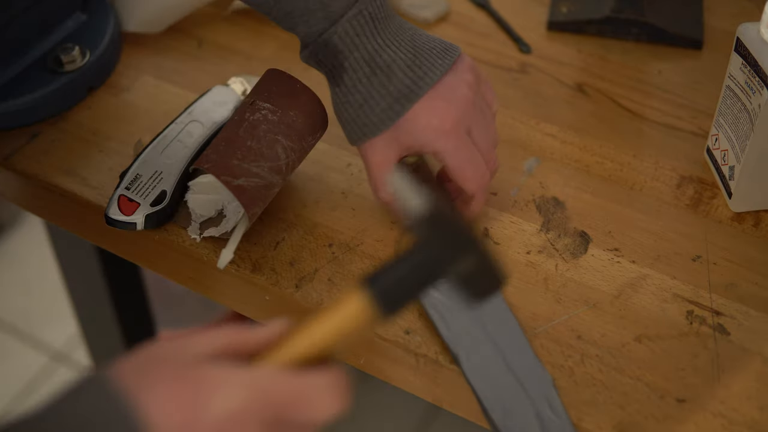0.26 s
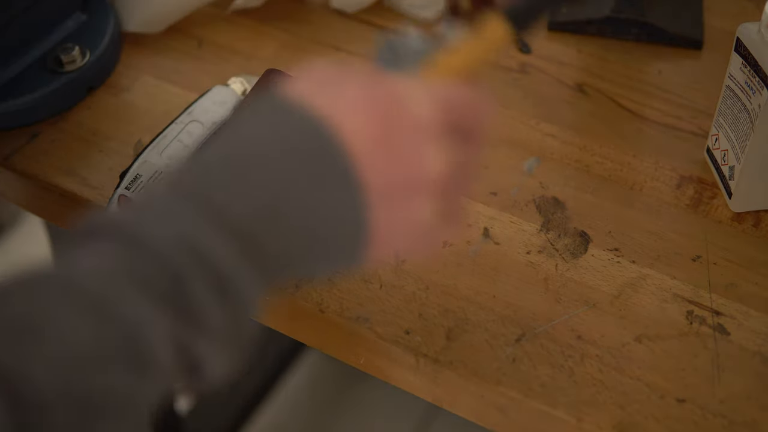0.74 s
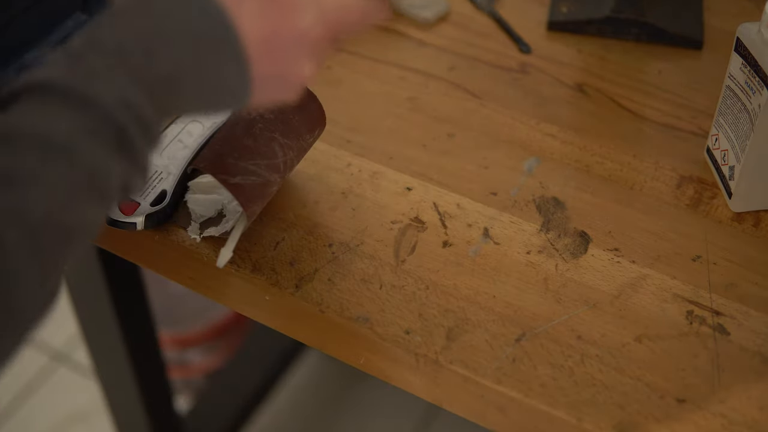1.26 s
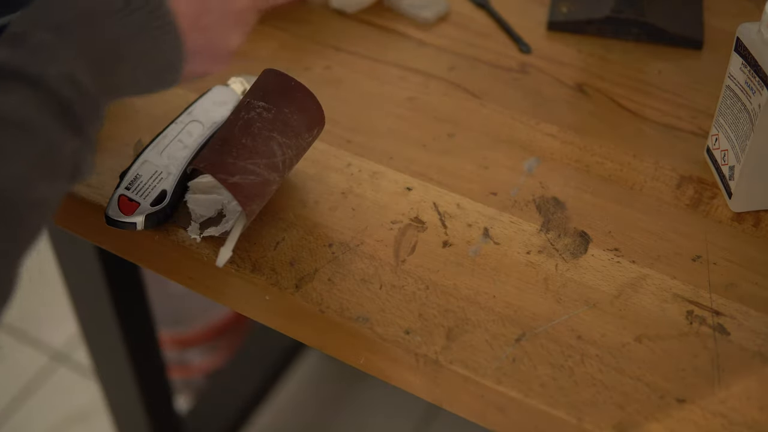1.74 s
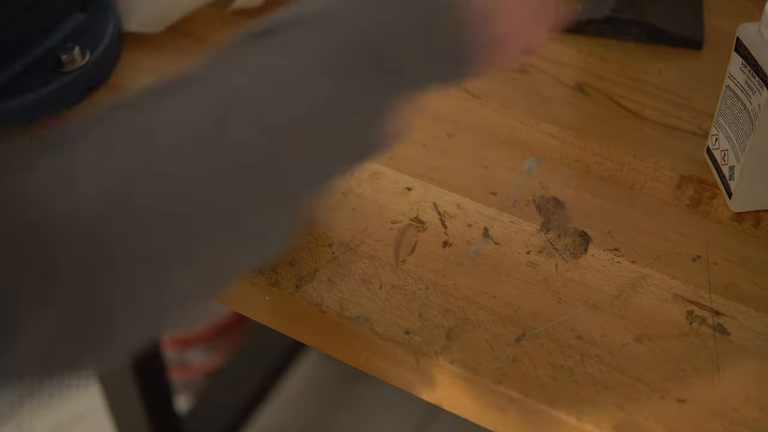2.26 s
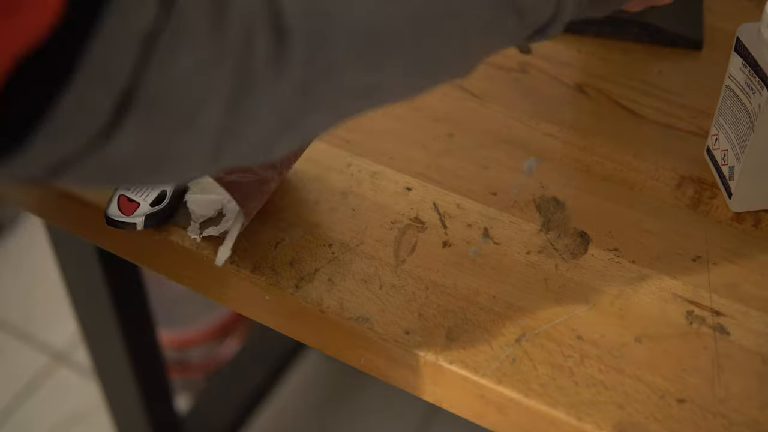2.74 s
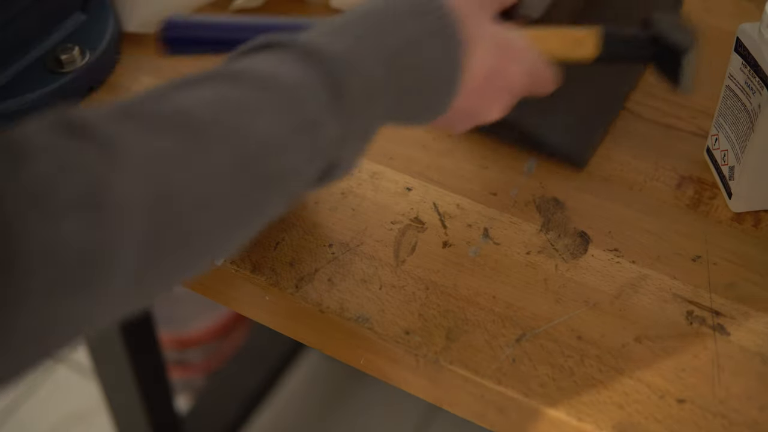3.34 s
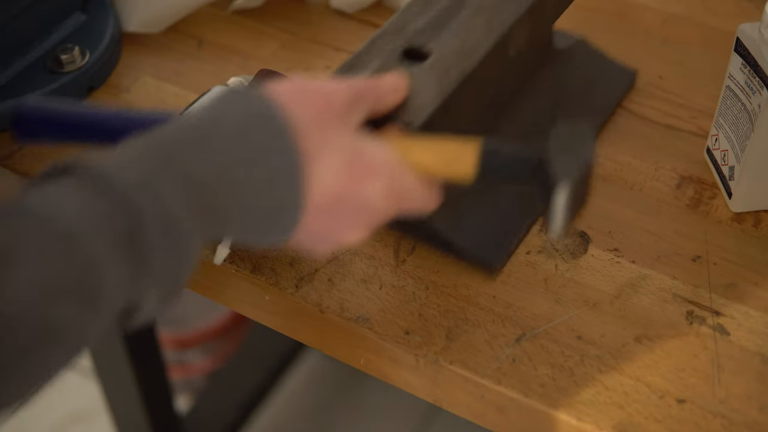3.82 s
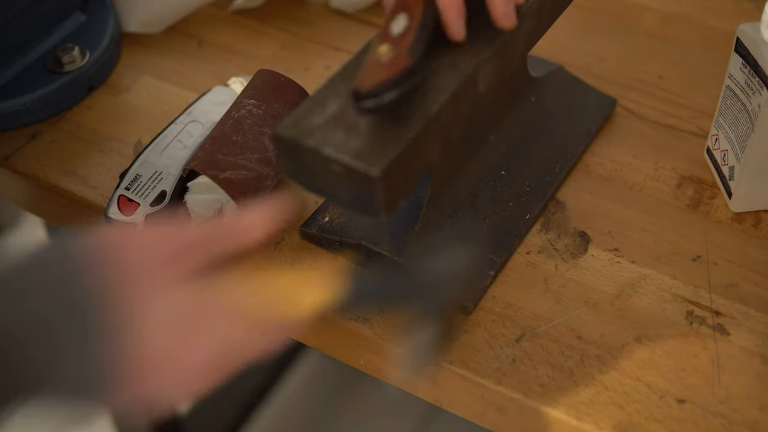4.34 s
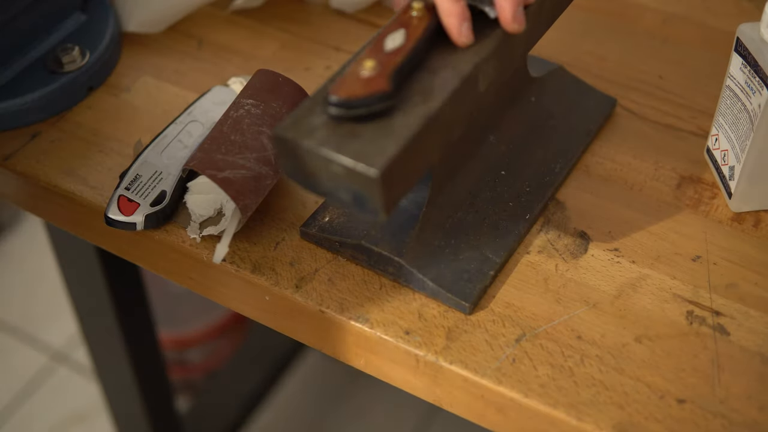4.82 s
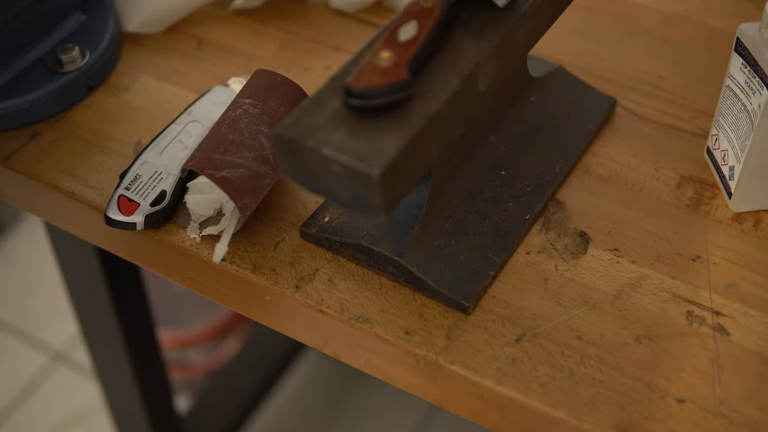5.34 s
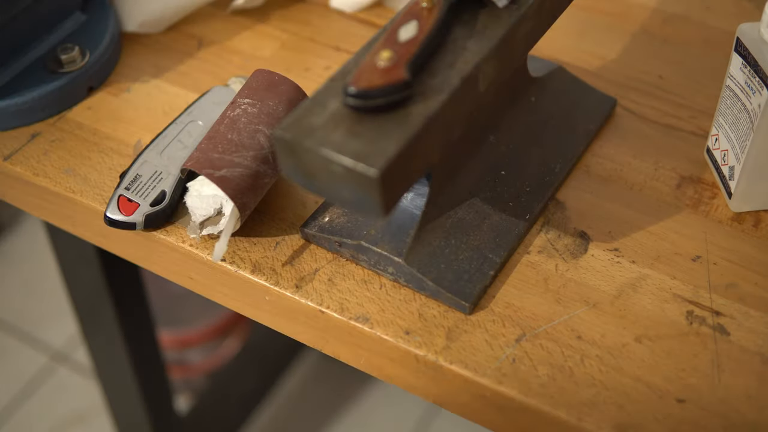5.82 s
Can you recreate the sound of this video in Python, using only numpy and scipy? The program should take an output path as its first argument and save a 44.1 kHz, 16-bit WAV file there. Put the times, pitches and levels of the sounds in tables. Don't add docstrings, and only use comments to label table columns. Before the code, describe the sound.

Close up at a wooden workbench in a small tiled room with quiet, low air noise. From 0 to 0.3 s, faint dull bumps as tools are handled; between 0.6 and 1.5 s, small dry ticks and clacks, with soft hand and sleeve brushing that continues to about 2.5 s. Around 2.8 s a sharp clack, and a small heavy anvil breaks loose, dragging until about 4.3 s: a coarse juddering scrape, hollow droning of the bench, gritty hiss and thin wavering steel squeals, strongest near 3.3 s with a hard clack at 3.25 s. It eases and stops. At 4.52 s a knife clatters brightly onto the steel, rocking in quick taps until 4.6 s while the bench answers with woody thumps and short echo. Soft bumps follow near 5.1 and 5.5 s, a dead knock, then brushing that swells to a louder rub and bump at 6 s.

```python
import sys
import numpy as np
from scipy import signal
from scipy.fft import rfft, irfft, next_fast_len
from scipy.io import wavfile
from scipy.ndimage import uniform_filter1d, map_coordinates

SR = 44100
rng = np.random.default_rng(int(sys.argv[2]) if len(sys.argv) > 2 else 0)


def unload_audio(sound):
    columns = np.transpose(np.atleast_2d(sound))
    steps = np.round(np.clip(columns, -1, 1) * 32767)
    wavfile.write(sys.argv[1], SR, steps.astype(np.int16))


def magnitude_from_level(level_db):
    exponent = np.asarray(level_db, float) / 20
    return 10 ** exponent


N = 267687
TOP_HZ = 15800

# pitch_hz, level_db (per Hz)
AIR = [(15, -37), (25, -21), (76, 5.5), (206, -5), (309, -10), (560, -16), (641, -1), (1400, -18),
       (2480, -9.5), (5430, -14), (12200, -14.5), (14800, -22), (16000, -14)]
# pitch_hz, likeness (0 to 1)
ALIKE = [(60, .997), (180, .994), (350, .975), (700, .88), (1400, .76), (2800, .5), (5600, .33),
         (11000, .22)]
# pitch_hz, time to fall 60 dB t60_s
ROOM = [(100, 0.39), (500, 0.49), (2000, 0.62), (6000, 0.45), (14000, 0.36)]
# pitch_hz, width_hz, level_db
BENCH = [(141, 13.5, -8.5), (207, 21, -1), (220.9, 5.1, 2.5), (259, 26.3, -1.5), (291, 25, -6),
         (330, 30, -9.5), (420, 44, -7.5), (547, 31, 0.5), (700, 59, -10), (827, 30, -7)]
# pitch_hz, width_hz, level_db
LEGS = [(72.5, 4, 10.5), (71, 9.8, -7.5)]

# start_s, peak_db, pitch_hz, contact_t60_s
THUDS = [(.001, -46.5, 333, 0.15), (.002, -52, 610, 0.14), (.003, -60.5, 900, .2), (.17, -65, 1400, .12),
         (.04, -53, 330, .2), (.075, -52, 332, 0.22), (.002, -66, 2450, .3), (.168, -54, 650, 0.04),
         (.169, -48, 420, 0.041), (.176, -48.5, 252, 0.1), (.215, -51, 333, 0.11), (.235, -48, 207, 0.14),
         (.298, -58.5, 2720, .06), (.298, -60, 4480, .01), (.974, -56, 700, .02), (1.133, -53.5, 715, .008),
         (4.524, -32, 360, 0.044), (4.57, -31, 433, .08), (4.578, -31, 648, .05), (4.59, -33, 149, 0.16),
         (4.625, -32, 376, 0.11), (5.091, -43, 830, 0.064), (5.094, -35.5, 530, 0.053),
         (5.104, -37, 290, 0.11), (5.165, -45.5, 540, 0.048), (5.17, -45, 281, 0.18),
         (5.451, -47, 784, .04), (5.458, -36.5, 232.5, 0.053), (5.54, -44, 320, 0.03),
         (5.997, -31.5, 740, 0.11)]
# start_s, peak_db, pitch_hz, width_hz
KNOCK = (5.526, -30, 330, 330)

# peak_s (loudest moment), rise_s, fall_s, wood_db, sleeve_over_wood_db
STROKES = [(.31, 0.012, 0.43, -69.5, 1.5), (.64, 0.12, 0.46, -63, -1), (1.0, 0.13, 0.54, -62, -3),
           (1.22, 0.069, 0.38, -59, -4), (1.4, 0.056, 0.14, -59, 1.5), (1.73, 0.16, 0.29, -65, 0),
           (2.06, 0.25, 0.34, -64.5, -0.5), (2.421, 0.13, .3, -57.5, 2.5), (2.76, 0.33, 0.16, -58.5, 5),
           (4.25, 0.075, 0.039, -69, 13.5), (4.399, 0.17, 1, -56, -4), (4.88, 0.16, 0.3, -51.5, -2.5),
           (5.3, 0.13, 0.69, -55, -2.5), (5.465, 0.013, 0.66, -50, -9), (5.69, .1, 0.14, -44.5, -0.5),
           (5.86, 0.037, 0.048, -48, -1.5), (5.95, 0.016, 0.14, -42.5, 5.5), (6.02, 0.055, 0.18, -32.5, -5)]
# peak_s (loudest moment), rise_s, fall_s, level_db
SHOVES = [(.3, .01, 0.19, -66), (.8, 0.088, 0.33, -73), (1.2, 0.48, 0.86, -71.5), (2.0, 1, .3, -70),
          (2.4, 0.13, 0.18, -58.5), (2.76, 0.63, .03, -59.5), (4.2, 0.1, 0.46, -48.5),
          (4.8, 0.17, 0.47, -48.5), (5.2, 0.11, 0.37, -57), (5.465, 0.012, 0.16, -41),
          (5.7, 0.23, 1, -48.5), (5.97, 0.068, .3, -45.5)]
# pitch_hz, level_db (per Hz)
WOOD = [(590, -15), (1000, -8.5), (1270, -3.5), (1420, -4.5), (2330, -3), (2750, -3), (4680, -8.5),
        (6500, -18), (8450, -19), (14300, -120)]
# pitch_hz, level_db (per Hz)
CLOTH = [(2350, -35), (4000, -8), (5940, -4), (12300, -3.5), (15200, -7.5), (15700, -7)]
# pitch_hz, level_db (per Hz)
SHUFFLE = [(24, -40), (45, -3), (70, -4), (123, -10), (182, -1.5), (214, -4), (307, -2.5), (628, -9),
           (1300, -17.5), (1690, -21), (2860, -120)]
# pitch_hz, level_db (per Hz)
NUDGE = [(24, -41), (40, -25.5), (65, -5), (97, -8.5), (243, -4.5), (423, -12.5), (747, -12), (852, -6),
         (1300, -25), (1690, -40), (2860, -120)]

# start_s, clack_db, snap_over_clack_db, clack_hz, contact_t60_s
TICKS = [(.6753, -45.5, -19, 1630, 0.037), (.675, -43, -28, 3870, 0.041), (.948, -41.5, -27, 2800, .002),
         (.9525, -44, -27, 2800, .003), (0.974, -32, -19, 2360, 0.0027), (1.133, -37, -7, 2400, 0.002),
         (1.1372, -41, -12, 2700, .004), (1.2483, -43, -23, 2800, 0.015), (1.329, -41.5, -24, 2850, 0.0067),
         (1.368, -36, -15, 3200, 0.02), (1.497, -49.5, -13, 1700, .006), (2.7748, -38.5, -7, 1460, 0.018),
         (2.834, -25, -3, 1420, 0.028), (3.2497, -19, -11, 1520, 0.0059), (5.451, -41.5, -25, 1290, 0.11)]
# start_s, level_db
SNAPS = [
    (0.6, -39.5),
    (2.9575, -30.5),
    (4.766, -37),
    (5.0554, -28),
    (5.853, -37),
]
# pitch_hz, width_hz, level_db
TOOL = [(1330, 47, 9), (1500, 63, 11.5), (2270, 410, 2), (2746, 49, 9.5), (2850, 63, 9), (3350, 120, 10.5),
        (4000, 110, -1), (4470, 30, 0)]
# delay_s, level_db
BOUNCE = (.0043, -11)

# time_s, level_db
DRAG = [
    (2.76, -54.5),
    (2.88, -28.5),
    (3.02, -30.5),
    (3.31, -24.5),
    (3.55, -31),
    (3.66, -31.5),
    (3.76, -29),
    (3.98, -31.5),
    (4.3, -59.5),
]
# middle_s, half_length_s, extra_drone_db, bench_note_hz
JUDDERS = [
    (2.92, 0.093, 4.5, 267),
    (3.291, 0.023, 3, 232),
    (3.414, 0.1, 9, 224),
    (3.625, 0.12, -2, 250),
    (3.943, 0.068, -3.5, 226.5),
    (4.13, 0.19, 7.5, 260),
]
# peak_s (loudest moment), rise_s, fall_s, level_db
LURCHES = [
    (2.825, .015, 0.066, -33.5),
    (3.245, 0.02, .12, -35),
    (3.438, 0.019, .05, -35),
    (3.722, 0.024, 0.046, -47),
    (4.17, 0.066, 0.1, -48),
]
# pitch_hz, level_db (per Hz)
SCRAPE = [(210, -41), (350, -10), (467, -10), (550, -6), (639, -6.5), (1180, -10.5), (1370, -13),
          (1620, -13.5), (3260, -19.5), (7000, -50), (9100, -51), (15400, -120)]
# pitch_hz, level_db (per Hz)
GRIT = [(2350, -13), (4000, -2.5), (4280, -2), (5770, -7.5), (6290, -9), (11300, -15.5), (15700, -21)]
# pitch_hz, level_db, flare_s, flare_half_length_s
ANVIL = [(1330, -15.6, 3.31, 0.1), (1410, -3, 2.87, 0.1), (1410, -12, 3.3, .08), (1523, -11.1, 3.3, 0.1),
         (1803, -15.8, 3.44, 0.15), (2051, -19.9, 3.15, 0.26), (2331, -20.4, 2.95, 0.15),
         (2649, -22.9, 3.83, 0.53), (2930, -14, 3.07, 0.13), (3295, -22.6, 3.54, 0.29),
         (3555, -23.5, 3.36, 0.17)]
# pitch_hz, level_db, flare_s, flare_half_length_s
SQUEAL = [(4155, -23.0, 4.01, 0.08), (4155, -22.5, 3.74, 0.13), (4263, -22.6, 3.69, 0.12),
          (4941, -26.0, 3.96, 0.08), (4941, -24.9, 3.76, 0.1), (4941, -22.8, 3.3, 0.12),
          (4984, -22.7, 3.11, 0.24), (5577, -26.0, 3.21, 0.1), (5577, -23.5, 3.84, 0.08),
          (5598, -27.5, 3.21, 0.09), (5598, -23.3, 3.85, 0.09), (5749, -20.1, 4.06, 0.08),
          (5835, -26.6, 3.75, 0.2), (6556, -29.2, 3.34, 0.12), (7256, -29.8, 3.32, 0.08),
          (7332, -32.0, 3.51, 0.15), (7332, -28.9, 4.11, 0.18), (7332, -26.2, 3.23, 0.07),
          (8204, -33.9, 3.04, 0.12), (8204, -32.5, 3.81, 0.05), (8204, -26.1, 3.49, 0.16),
          (8505, -33.7, 3.95, 0.11), (8505, -32.9, 3.69, 0.38), (9237, -31.3, 3.07, 0.09),
          (9237, -25.9, 4.14, 0.15), (9388, -34.1, 3.64, 0.09), (9388, -29.9, 3.38, 0.07),
          (10002, -37.1, 3.48, 0.11), (10002, -34.1, 3.72, 0.12), (10002, -32.8, 3.02, 0.15),
          (10885, -34.9, 3.58, 0.08), (11283, -27.6, 4.07, 0.1), (11283, -26.9, 3.3, 0.09),
          (11283, -23.1, 3.69, 0.08), (12037, -34.8, 3.97, 0.13), (12037, -25.1, 3.5, 0.15),
          (12112, -34.4, 3.35, 0.07), (12112, -32.5, 3.64, 0.09), (12639, -35.3, 3.54, 0.16),
          (13662, -37.6, 3.7, 0.1), (13910, -37.9, 3.7, 0.1), (13910, -37.7, 3.34, 0.12),
          (14696, -35.5, 3.27, 0.07), (14696, -32.7, 3.68, 0.09), (14696, -32.5, 4.14, 0.1),
          (15202, -35.8, 3.72, 0.12), (15557, -36.6, 3.56, 0.06), (15557, -35.5, 3.87, 0.09),
          (15557, -35.0, 4.13, 0.06), (15557, -33.3, 3.28, 0.07)]
# pitch_hz, level_db, flare_s, flare_half_length_s
BOARDS = [(143, -6, 2.96, 0.082), (200, 3.5, 3.46, .05), (410, -7.5, 3.17, 0.17), (143, -1, 3.43, 0.091),
          (143, -2.5, 4.14, 0.11), (200, 0, 3.96, .06), (258.7, 2, 3.38, 0.056), (286.8, 4.5, 2.9, 0.055),
          (285, -1.5, 3.14, 0.09), (365, -7.5, 3.95, .07), (540, -1.5, 2.91, 0.076), (540, -6, 3.3, .04),
          (689, -7, 3.75, 0.075), (690, -7, 3.95, 0.085)]
# pitch_hz, lean_db
LEAN = [(60, 0), (380, 0), (700, -.5), (1290, -1.5), (2380, -2.5), (4400, -1.5), (8120, -1.5),
        (15000, -2.5)]

# start_s, peak_db, snap_db, bench_db, pitch_hz
KNIFE = [
    (4.5187, -14.5, -30, -13, 4200),
    (4.524, -16, -46, -19, 1500),
    (4.5352, -26, -34, -8, 1460),
    (4.5664, -30.5, -11, -2, 1560),
    (4.5768, -28.5, -11, -3, 1590),
    (4.5949, -30, -45, -1.5, 2900),
]
# pitch_hz, width_hz, level_db
BLADE = [(1230, 170, 1), (1460, 74, 11), (1590, 110, 8), (1744, 40, 6), (2053, 70, 7.5), (2280, 88, 8.5),
         (2870, 140, 8), (3010, 110, 4), (3400, 200, 1), (4280, 170, -5), (4770, 550, 6), (6050, 110, -29),
         (7000, 190, -11), (9200, 77, -16)]


def unit(x):
    return x / np.sqrt(np.mean(x ** 2) + 1e-20)


def along(points, hz):
    f, value = np.transpose(points)
    return np.interp(np.log(hz + 1), np.log(f + 1), value)


def shape(spectrum):
    return lambda hz: magnitude_from_level(along(spectrum, hz))


def filtered(x, response):
    m = next_fast_len(N + SR // 2)
    return irfft(rfft(x, m) * response(np.fft.rfftfreq(m, 1 / SR)), m)[..., :N]


def modes(table):
    def response(f):
        total = 0
        for k, (hz, width, db) in enumerate(table):
            total = total + (-1) ** k * magnitude_from_level(db) * 1j * f * width / (hz * hz - f * f + 1j * f * width)
        return total
    return response


def near(table, hz, share, fill_db):
    return lambda f: (modes(table)(f) + magnitude_from_level(fill_db)) * modes([(hz, share * hz, 0)])(f)


def snap(f):
    return (1j * f / (4500 + 1j * f)) ** 2 / (1 + 1j * f / 15000) ** 3


def add(x, start_s, peak_db, t60_s, response):
    t = np.arange(8192) / SR
    push = magnitude_from_level(-60 * t / t60_s) * rng.standard_normal(len(t))
    push[0] = 3
    spectrum = rfft(push, 2 * len(t)) * response(np.fft.rfftfreq(2 * len(t), 1 / SR))
    hit = irfft(spectrum)[:len(t)]
    part = x[round(start_s * SR):][:len(t)]
    part += (magnitude_from_level(peak_db) * hit / np.abs(hit).max())[:len(part)]


def wobble(rate):
    knots = rng.standard_normal(int(N * rate / SR) + 4)
    return map_coordinates(knots, [np.arange(N) * rate / SR])


def stereo(colour, rough_db, rate, patchy_db, size):
    rough = rng.standard_normal((2, N)) * magnitude_from_level(rough_db * wobble(rate))
    z = signal.stft(rough, nperseg=512)[2]
    field = uniform_filter1d(rng.standard_normal(z.shape[1:]), size=4, axis=0)
    field = uniform_filter1d(field, size=size, axis=1)
    pair = signal.istft(z * magnitude_from_level(patchy_db * unit(field)), nperseg=512)[1][:, :N]

    def spread(hz):
        turn = np.arccos(np.clip(along(ALIKE, hz), -1, 1)) / 2
        return colour(hz) * (hz < TOP_HZ) * np.array([np.cos(turn), np.sin(turn)])

    mid, side = filtered(pair, spread)
    return unit(np.array([mid + side, mid - side]))


def steady(x, seconds):
    power = uniform_filter1d(np.mean(x ** 2, axis=0), size=int(seconds * SR))
    return x / np.sqrt(np.abs(power) + 1e-3)


def swells(rows):
    t = np.arange(0, N, 32) / SR
    power = 0
    for start_s, rise_s, fall_s, db in rows:
        away = np.maximum((start_s - t) / rise_s, (t - start_s) / fall_s)
        power = power + magnitude_from_level(2 * (db - 10 * away))
    return np.interp(np.arange(N) / SR, t, np.sqrt(power))


def air():
    return magnitude_from_level(-69.5) * stereo(shape(AIR), rough_db=-2.5, rate=7.52, patchy_db=-2.0, size=8)


def thuds():
    x = np.zeros(N)
    for start_s, db, hz, t60_s in THUDS:
        own = near([(hz, .1 * hz, 0)], hz, .8, fill_db=-20)
        bench = near(BENCH, hz, .6, fill_db=-20)
        add(x, start_s, db, t60_s, lambda f: own(f) + magnitude_from_level(-12) * bench(f))
    start_s, db, hz, width_hz = KNOCK
    add(x, start_s, db, .001, lambda f: modes([(hz, width_hz, 0)])(f) ** 2)
    return np.array([x, x])


def brushing():
    wood = swells([row[:4] for row in STROKES])
    wood = wood * stereo(shape(WOOD), rough_db=0.5, rate=83, patchy_db=2.0, size=12)
    cloth = swells([(s, rise, fall, db + over) for s, rise, fall, db, over in STROKES])
    cloth = cloth * stereo(shape(CLOTH), rough_db=1.0, rate=420, patchy_db=2.0, size=8)
    hand = steady(stereo(shape(SHUFFLE), rough_db=1.0, rate=44, patchy_db=1.5, size=8), seconds=0.041)
    foot = steady(stereo(shape(NUDGE), rough_db=-2.0, rate=46, patchy_db=-1.5, size=8), seconds=0.047)
    creep = np.abs(np.arange(N) / SR - 2.5) < .3
    return wood + cloth + swells(SHOVES) * np.where(creep, foot, hand)


def ticks():
    x = np.zeros(N)
    body_db = -28
    dry_snaps = [(s, db + body_db, -body_db, 3200, 0.0095) for s, db in SNAPS]
    for start_s, db, snap_db, hz, t60_s in TICKS + dry_snaps:
        add(x, start_s, db + snap_db, t60_s, snap)
        add(x, start_s, db, t60_s, near(TOOL, hz, 1.2, fill_db=-1))
    delay_s, echo_db = BOUNCE
    x = x + magnitude_from_level(echo_db) * np.roll(x, round(delay_s * SR))
    return x * magnitude_from_level([[-.4], [.4]])


def steel(table, rate, idle_db, spread):
    x = np.zeros((2, N))
    span = slice(int(DRAG[0][0] * SR), int(DRAG[-1][0] * SR))
    t = np.arange(N)[span] / SR
    knots = np.arange(t[0], t[-1] + 1 / rate, 1 / rate)
    for hz in sorted({row[0] for row in table}):
        size = (3, len(knots))
        a = rng.standard_normal(size) + 1j * rng.standard_normal(size)
        phase = np.exp(1j * np.cumsum(a[0].real))
        drift = np.array([np.interp(t, knots, phase + spread * a[side]) for side in (1, 2)])
        flares = [row[1:] for row in table if row[0] == hz]
        fed = 0
        for db, flare_s, half_s in flares:
            flare = np.exp(-.5 * ((t - flare_s) / (.7 * half_s)) ** 2)
            fed = fed + magnitude_from_level(db) * (magnitude_from_level(idle_db) / len(flares) + flare)
        x[:, span] += fed * np.real(drift * np.exp(2j * np.pi * hz * t))
    return x


def anvil():
    t = np.arange(N) / SR
    drag_s, drag_db = np.transpose(DRAG)
    scrape_db = np.interp(t, drag_s, drag_db, left=-120, right=-120)

    free_hz = 270
    bench_db, note_hz = scrape_db + 1.5, free_hz
    for start_s, half_s, extra_db, hz in JUDDERS:
        bite = np.exp(-.5 * ((t - start_s) / half_s) ** 2)
        bench_db = bench_db + bite * extra_db
        note_hz = note_hz + bite * (hz - free_hz)
    edge = np.clip((note_hz - 215) / 60, 0, 1) * np.pi / 2
    deep = stereo(near(BENCH, 221, 0.59, fill_db=-16.5), rough_db=2.5, rate=41, patchy_db=-4.5, size=8)
    high = stereo(near(BENCH, 286, 0.69, fill_db=-15), rough_db=1.5, rate=51, patchy_db=1.5, size=8)
    bench = magnitude_from_level(bench_db) * steady(np.cos(edge) * deep + np.sin(edge) * high, seconds=0.054)

    rocking = np.hypot(magnitude_from_level(scrape_db - 18), swells(LURCHES))
    legs = stereo(modes(LEGS), rough_db=2, rate=21, patchy_db=0.5, size=8)
    legs = rocking * steady(legs, seconds=0.066)

    scrape = stereo(shape(SCRAPE), rough_db=0.5, rate=170, patchy_db=1.0, size=12)
    scrape += .88 * steel(ANVIL, rate=35, idle_db=-9, spread=.58)
    scrape += 1.05 * steel(SQUEAL, rate=28, idle_db=-12, spread=.7)
    scrape += 1.4 * steel(BOARDS, rate=45, idle_db=-30, spread=.08)

    grit_db = -13 - 30 + 1.08 * (scrape_db + 30)
    grit = magnitude_from_level(grit_db) * stereo(shape(GRIT), rough_db=2.0, rate=260, patchy_db=1.5, size=6)

    total = bench + legs + magnitude_from_level(scrape_db) * scrape + grit
    return filtered(total, lambda hz: magnitude_from_level(np.outer([.5, -.5], along(LEAN, hz))))


def knife():
    x = np.zeros(N)
    for start_s, db, snap_db, bench_db, hz in KNIFE:
        wood_db = db + bench_db
        add(x, start_s, db + snap_db, .012, snap)
        add(x, start_s, db - 1.5, .025, near(BLADE, hz, 0.68, fill_db=-2))
        add(x, start_s, db - 10, .06, near([(2400, 3600, 0)], 2400, 1.6, fill_db=-30))
        add(x, start_s, wood_db + 2.5, .08, near(BENCH, 620, 0.37, fill_db=-5))
        add(x, start_s, wood_db + 0.5, .2, near(BENCH, 195, 0.93, fill_db=-22.5))
        add(x, start_s, wood_db - 19, .15, modes(LEGS))
    return x * magnitude_from_level([[-.6], [.6]])


def room(x):
    wet, step = np.zeros((2, N + 2 * SR)), SR // 3
    for i in range(0, N, step):
        hz, t, z = signal.stft(rng.standard_normal((2, SR * 3 // 5)), SR, nperseg=256)
        turn = np.arccos(np.clip(along(ALIKE, hz), -1, 1))[:, None] / 2
        z = np.cos(turn) * z[0] + np.sin(turn) * z[1] * [[[1]], [[-1]]]
        dying = magnitude_from_level(-60 * t / along(ROOM, hz)[:, None])
        tail = signal.istft(z * dying, SR, nperseg=256)[1]
        part = signal.fftconvolve(x[None, i:i + step], tail / np.linalg.norm(tail[0]), axes=1)
        start = i + 150
        wet[:, start:start + part.shape[1]] += part
    return wet[:, :N]


def scene():
    quiet, bump, rub = air(), thuds(), brushing()
    small, drag, blade = ticks(), anvil(), knife()
    sent = magnitude_from_level(-0.5) * bump + magnitude_from_level(-0.5) * small + magnitude_from_level(-1.0) * blade
    tail = filtered(room(sent.mean(axis=0)), lambda hz: hz < TOP_HZ)
    return quiet + bump + rub + small + drag + blade + tail


def roll_off(x):
    return signal.sosfilt(signal.butter(12, 16800, fs=SR, output="sos"), x)


def record(dry):
    mix = filtered(dry, lambda hz: hz < 16600)
    return roll_off(mix)


dry = scene()
out = record(dry)
unload_audio(out)
```